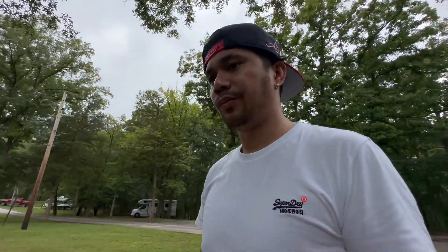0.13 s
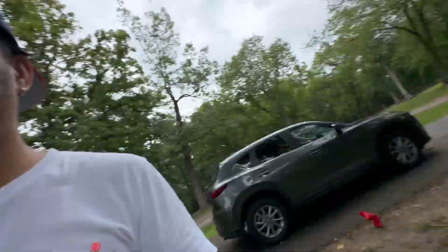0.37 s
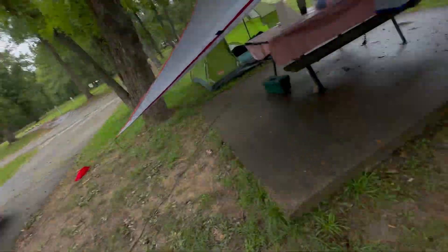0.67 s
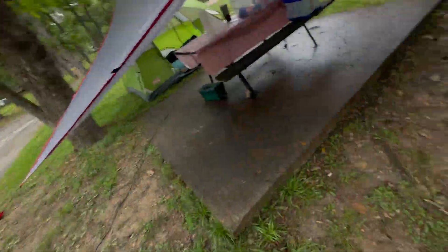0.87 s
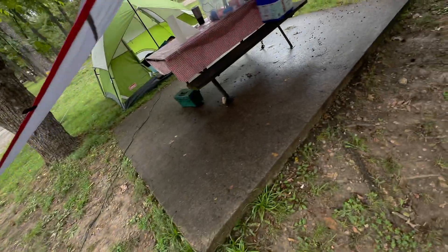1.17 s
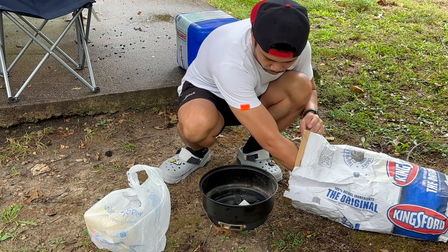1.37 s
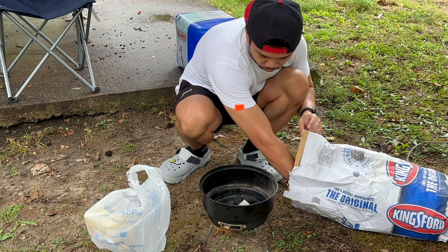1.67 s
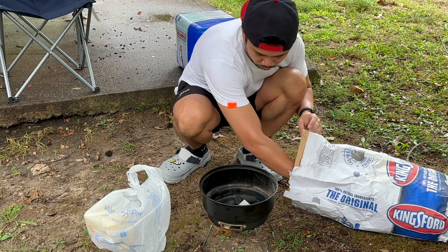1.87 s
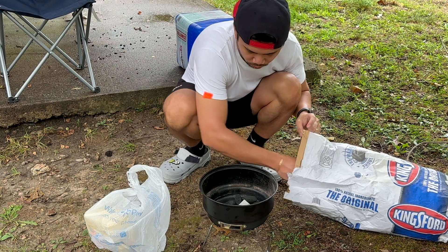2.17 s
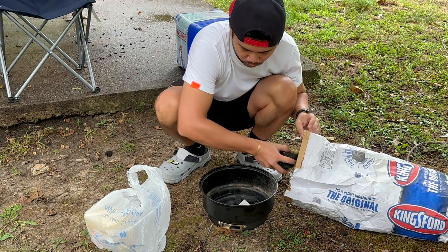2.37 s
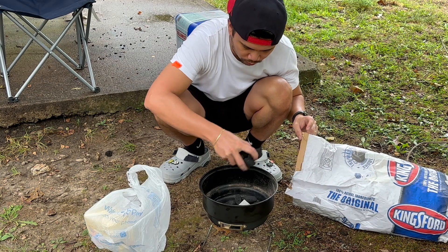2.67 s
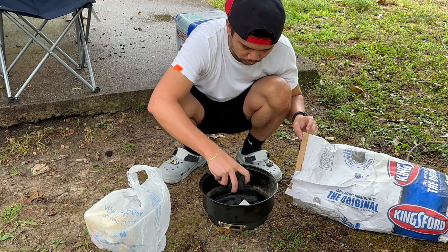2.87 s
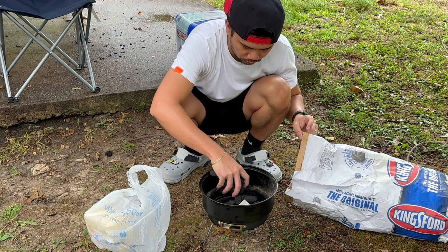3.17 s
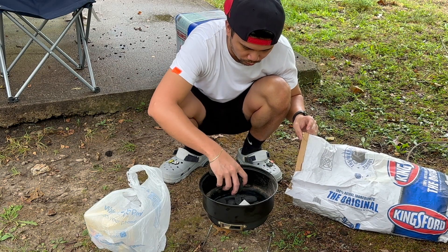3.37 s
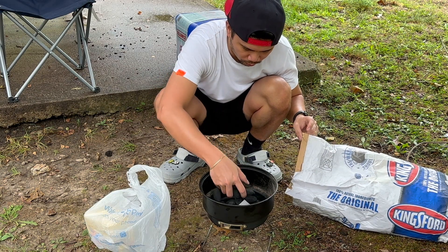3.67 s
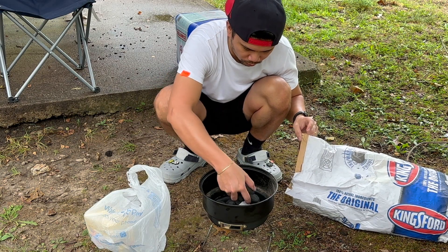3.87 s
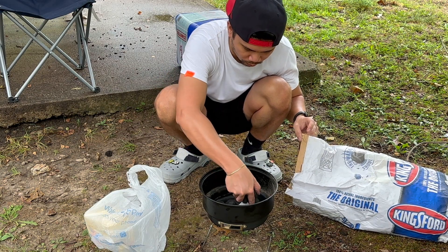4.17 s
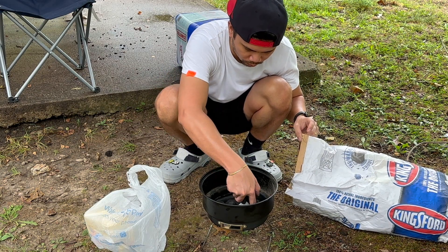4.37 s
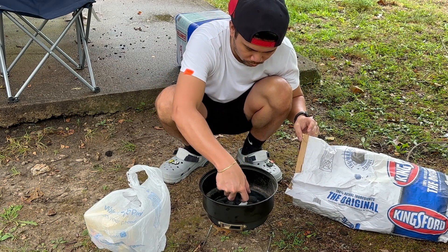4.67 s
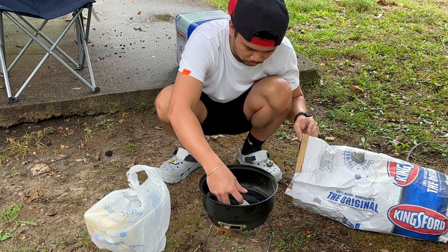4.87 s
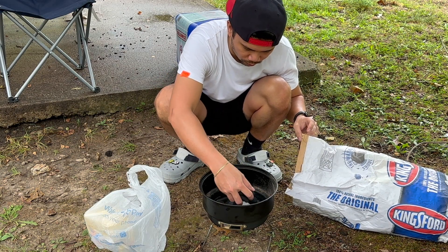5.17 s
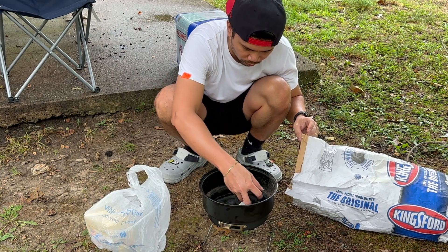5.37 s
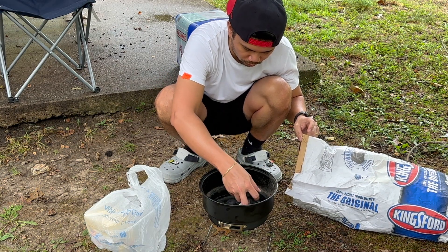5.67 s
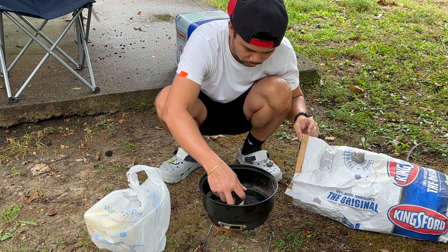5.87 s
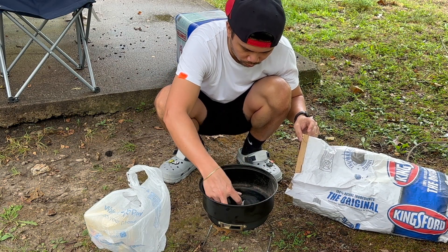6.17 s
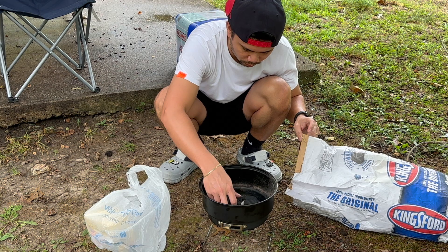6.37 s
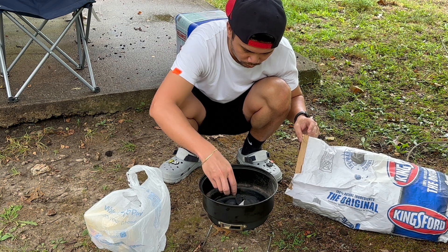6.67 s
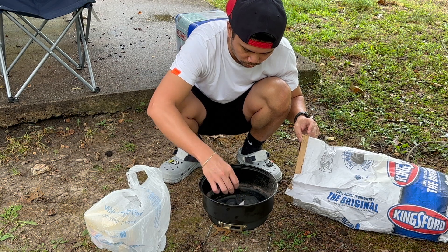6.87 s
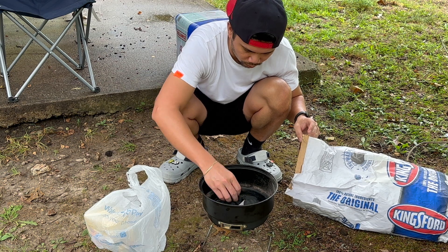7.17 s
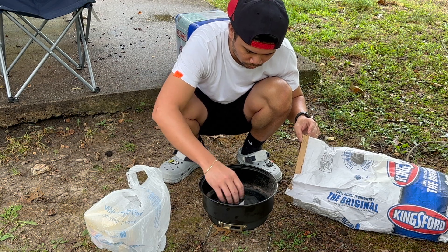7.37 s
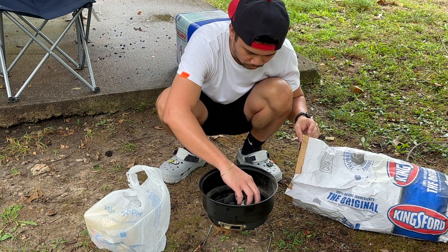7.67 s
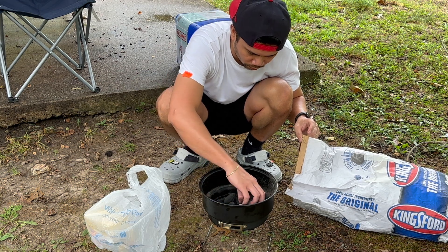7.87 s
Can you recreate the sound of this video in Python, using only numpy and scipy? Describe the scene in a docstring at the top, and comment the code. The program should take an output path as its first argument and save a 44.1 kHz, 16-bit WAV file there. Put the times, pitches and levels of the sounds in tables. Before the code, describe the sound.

From 0 to 1.3 seconds a hand-held microphone is carried round outdoors: low wind buffet, soft leaves, faint hiss and small dry ticks, the strongest near 0.7, over a low distant engine. An abrupt cut at 1.3 brings close stiff paper, crinkling with hollow thumps and crisp snaps, busiest until 1.7 and again around 2.2, fading by 2.4. Charcoal lumps begin knocking into a thin steel bowl at 3.0, clatter brightly around 3.3, and strike the loudest clang at 3.6, leaving a thin ring; smaller hits follow near 3.85. Softer dull clicks of lump on lump run from 4.4 to 5.05, with isolated knocks at 5.75 and 6.2. A second strong clang comes at 6.75 amid a quick cluster, then lighter knocks continue to 7.5, and a last faint one at 7.8. Far traffic, a wavering low engine drone and barely audible insects continue to about 8 seconds.

```python
"""Lumps of charcoal knock and clang in a thin steel grill bowl, taken by hand from a rustling paper sack
outdoors, over distant engine hum and insects. Before that, up to a cut, a hand-held microphone swings
round in light wind with a few ticks. Steel and lumps are damped sines struck by noise and set off at
listed times; paper, wind, leaves and air are shaped noise; the engine is a drifting sine."""
import sys
import numpy as np
from scipy import signal
from scipy.fft import rfft, irfft, next_fast_len
from scipy.io import wavfile
from scipy.ndimage import uniform_filter1d, map_coordinates

SR = 44100
rng = np.random.default_rng(int(sys.argv[2]) if len(sys.argv) > 2 else 0)


def level_to_linear(level):
    """Convert decibel levels to linear amplitude factors, elementwise."""
    exponent = np.asarray(level, float) / 20
    return 10 ** exponent


def wrap_up_sound(samples):
    """Save the sound to the file named by the first command line argument, as 16-bit audio."""
    columns = np.atleast_2d(samples).T
    # keep every value between -1 and 1, then stretch to whole-number steps
    tamed = np.clip(columns, -1, 1)
    steps = np.round(tamed * 32767).astype(np.int16)
    wavfile.write(sys.argv[1], SR, steps)


N = 353682  # length in samples
CUT_S = 1.333  # the microphone swing ends here and the charcoal scene begins

# how alike outdoor air sounds at left and right: (frequency [Hz], likeness [-1 to 1])
ALIKE = [(60, 1), (180, 0.82), (550, 0.16), (1650, -0.14), (4970, 0.92), (15000, 0.12)]


def unit(x):
    """Scaled to rms 1."""
    return x / np.sqrt(np.mean(x ** 2) + 1e-20)


def along(points, hz):
    """Reads (frequency [Hz], value) points on a log frequency axis."""
    f, v = np.transpose(points)
    return np.interp(np.log(hz + 1), np.log(f + 1), v)


def curves(rows):
    """One value per sample for each column after the time [s]; -150 outside the table."""
    s, *cols = np.transpose(rows)
    return [np.interp(np.arange(N) / SR, s, c, left=-150, right=-150) for c in cols]


def wobble(rate):
    """A smooth random curve with rate knots a second."""
    knots = rng.standard_normal(int(N * rate / SR) + 4)
    return map_coordinates(knots, [np.arange(N) * rate / SR])


def swells(rows, edge_db):
    """Summed gain of (time [s], half length [s], level [dB]) swells that rise and fall evenly in dB.

    Each falls by edge_db over one half length, on both sides."""
    t = np.arange(N) / SR
    return sum(level_to_linear(db - edge_db * np.abs(t - s) / half_s) for s, half_s, db in rows)


def filtered(x, response):
    """Filters x by a complex response of frequency."""
    m = next_fast_len(x.shape[-1] + 8192)  # room for the filter's tail
    spectrum = rfft(x, m) * response(np.fft.rfftfreq(m, 1 / SR))
    return irfft(spectrum, m)[..., :x.shape[-1]]


def rush(spectrum, alike, grit_db):
    """Stereo noise of rms 1; grit_db breaks it into short grains."""
    grains = level_to_linear(grit_db * (wobble(250) + wobble(40)))
    pair = rng.standard_normal((2, N)) * grains

    def mid_side(hz):
        turn = np.arccos(np.clip(along(alike, hz), -1, 1)) / 2
        return level_to_linear(along(spectrum, hz)) * [np.cos(turn), np.sin(turn)]

    mid, side = filtered(pair, mid_side)
    return unit(np.array([mid + side, mid - side]))


def ring(t, hz, db, t60, attack):
    """Sum of damped sines, one per mode, with a soft onset of attack seconds."""
    hz, db, t60 = (np.reshape(v, (-1, 1)) for v in (hz, db, t60))
    modes = level_to_linear(db - 60 * t / t60) * np.sin(2 * np.pi * hz * t)
    return modes.sum(0) * (1 - np.exp(-t / attack))


def add(track, s, sound):
    """Mixes a sound in at s seconds."""
    part = track[round(s * SR):][:len(sound)]
    part += sound[:len(part)]


def bowl():
    """Each contact knocks dully, clangs the sheet and sounds the note of the bowl's floor."""
    # a lump strikes bare steel: (time [s], level [dB], knock re level [dB],
    # floor note re level [dB], hardness [dB per octave])
    bare_hits = [(3.1413, -32.5, -1, -1, 5), (3.1691, -38, -7, -0.5, 2.5), (3.289, -27, -25, -4.5, -3),
                 (3.3128, -23.5, -23.5, -1.5, -3.5), (3.3332, -25, 1.5, -5, 5), (3.382, -33.5, 2, 1, 6),
                 (3.45, -34.5, -3.5, -3, 1.2), (3.5938, -10, -19, -12, 2.5), (3.6234, -31, 3.5, 16, -11.5),
                 (3.8457, -29.5, 2.5, -6.5, 6.5), (3.8804, -32.5, 1, -12, -5), (4.8485, -39, 7.5, -9.5, 8),
                 (5.4554, -57, 3, -8, 5.5), (6.7221, -31.5, -3, -4.5, -6), (6.7471, -18, -14.5, 0, 2.5),
                 (6.772, -27.5, -18.5, 3, 1), (6.8193, -29.5, -18.5, -20, 0), (6.8654, -41.5, -18.5, -2, 4),
                 (6.9446, -42.5, -18, -5, 0.5), (7.0375, -46.5, -21, -9, 0.3),
                 (7.0993, -43.5, -5.5, -11, -6), (7.1707, -48.5, -21, -7.5, -2.3)]
    # a lump lands on other lumps: (time [s], knock level [dB], clang re knock [dB])
    lump_hits = [(3.0375, -42.5, -10), (3.1096, -43.5, -8.5), (4.4466, -42, -10.5), (4.513, -46, -5.5),
                 (4.554, -37.5, -11.5), (4.5848, -43, -10), (4.6932, -49, -12), (4.8125, -41.5, -13.5),
                 (4.995, -47.5, -8.5), (5.0276, -44, -11), (5.0404, -44.5, -6), (5.7464, -31.5, -11),
                 (6.2141, -49, -11.5), (6.6048, -53.5, -9), (7.187, -38, -14.5), (7.2098, -38, -12),
                 (7.3865, -32, -12.5), (7.5014, -52.5, -11), (7.5233, -43.5, -26), (7.8278, -44, -21)]
    # the heaviest drops jolt the lumps off the floor: (from [s], to [s])
    jolts = [(3.59, 3.61), (6.7, 6.85)]
    # dull knock of a lump on the loaded bowl: (frequency [Hz], width [Hz], level [dB])
    lump_modes = [(565, 47, -2.5), (784, 80, -7.5), (1000, 54, -0.5), (1320, 140, -12.5), (1920, 71, -19)]
    # clear modes of the undamped sheet: (frequency [Hz], level [dB], t60 [s])
    clear_modes = [(544, -10, .12), (2113, -2, .22), (2410, -20, .4), (2995, -3, .24), (3348, -14, .22),
                   (3507, -15, .22), (3665, -15, .2), (4040, -5, .24), (4107, -2, .12), (4210, -15, .4),
                   (4441, -16, .45), (4538, -16, .15), (4786, -15, .12), (5180, -21, .22), (5400, -17, .25),
                   (5534, -20, .24), (5841, -25, .28), (6390, -27, .22), (6925, -24, .26), (8270, -23, .22),
                   (8651, -25, .2)]

    out, t = np.zeros(N), np.arange(SR // 2) / SR
    lump_hz, lump_width, lump_db = np.transpose(lump_modes)
    hz, mode_db, t60 = np.transpose(clear_modes)
    steel = crowd(t)
    # hits on other lumps in the columns of bare hits: floor note 16 dB under the knock, soft contact
    muffled = [(s, db + clang_db, -clang_db, -16 - clang_db, -3.5) for s, db, clang_db in lump_hits]
    for s, db, knock_db, note_db, hardness_db in bare_hits + muffled:
        lifted = any(start < s < end for start, end in jolts)
        free = 0.89 if lifted else 0.73  # freedom of the steel to ring, 1 = undamped
        # the floor sounds a scattered note under lumps, a fixed one free of them
        note_hz = 965.2 if lifted else 1011 + 16 * rng.standard_normal()

        spread = 1 + 0.033 * rng.standard_normal(len(lump_hz))  # no two lumps are alike
        scattered_db = lump_db + rng.normal(0, 2.5, len(lump_hz))
        knock = ring(t, lump_hz * spread, scattered_db, 2 / lump_width, .0015)
        grain = rng.standard_normal(len(t))
        crumble = unit(filtered(grain, lambda f: np.exp(-np.log(f / 850 + 1e-9) ** 2 / .5)))
        knock = knock + 0.48 * level_to_linear(-60 * t / 0.054) * (1 - np.exp(-t / 0.0029)) * crumble

        # the crumbly lump chatters against the steel for some milliseconds, with a faint longer tail
        chatter = rng.standard_normal(len(t)) * (level_to_linear(-60 * t / .012) + 0.071 * level_to_linear(-60 * t / 0.42))
        chatter = chatter / np.linalg.norm(chatter)
        force = filtered(chatter, lambda f: level_to_linear(hardness_db * np.log2(f / 3000 + 0.31)))
        bare_db = np.clip(-.35 * knock_db, -6, 0)  # lump on lump hardly wakes the clear modes
        clear_db = mode_db + bare_db + hardness_db * np.log2(hz / 3000) + rng.normal(0, 3, len(hz))
        clear = ring(t, hz, clear_db, t60, .003)
        dense = signal.fftconvolve(force, steel)[:len(t)]
        damping = level_to_linear(-60 * t * (1 / free - 1) / 0.17)
        clang = (dense + 1.126 * clear) * damping

        # a close pair of floor modes beats
        note = ring(t, [note_hz, note_hz + 21], [0, -6], free * np.array([.33, .28]), 0.0027)
        add(out, s, level_to_linear(db + knock_db + 3.5) * knock + level_to_linear(db - 10) * clang + level_to_linear(db + note_db) * note)
    return out


def crowd(t):
    """Impulse answer of the hundreds of crowded weak modes of the steel."""
    # balance of the dense modes: (frequency [Hz], relative level [dB])
    dense_balance = [(300, -40), (540, -16.5), (1000, -13), (1500, -9), (2150, -1), (2600, -8), (3000, -7),
                     (3600, -8.5), (4100, -9), (4900, -21), (5600, -17.5), (7000, -20.5), (8300, -26),
                     (11000, -32.5), (13500, -24.5), (16000, -39.5)]
    # their typical decay: (frequency [Hz], t60 [s])
    dense_t60 = [(500, 0.12), (2000, 0.16), (5000, 0.2), (9000, 0.3), (14000, 0.11)]

    hz = 400 + 15800 * rng.random(700) ** 1.5  # more crowded toward the low end
    db = along(dense_balance, hz) - 9 + 3 * rng.standard_normal(700)
    t60 = along(dense_t60, hz) * level_to_linear(1.5 * rng.standard_normal(700))
    return ring(t, hz, db, t60, 0.0015)


def rim():
    """Long thin tones of the free rim after hard blows, until something touches it."""
    # modes of the rim: (frequency [Hz], relative level [dB], t60 [s])
    rim_modes = [(560, -3, 1.4), (947, -1, 4), (1437, -9, 1.1), (1960, -3, 2.1), (2256, 0, 1.2),
                 (2304, -3, 3), (2686, -6, .85), (4210, 0, .5), (4511, 3, .55), (4646, 2, .6),
                 (5776, -18, .6)]
    # blows that set it singing: (time [s], level [dB])
    blows = [(3.595, -51.5), (3.846, -58.5), (6.747, -62.5)]
    # a hand or lump stops the rim: (time [s])
    touches = [4.447, 7.1]

    out, t = np.zeros(N), np.arange(2 * SR) / SR
    hz, mode_db, t60 = np.transpose(rim_modes)
    for s, db in blows:
        touch = min(h for h in touches if h > s) - s
        damped = level_to_linear(-250 * np.clip(t - touch, 0, None))  # 250 dB per second once touched
        add(out, s, damped * ring(t, hz, db + mode_db, t60, 0.0069))
    return out


def sack():
    """Stiff paper: grainy crinkle and a hollow thump at each tug, and single snaps as it creases."""
    # paper creases: (time [s], relative level [dB], hollow part re that level [dB])
    snaps = [(1.337, -45, 4), (1.36, -48, 8), (1.3758, -42, -5), (1.4087, -48, 1), (1.4462, -38, -2),
             (1.4664, -31.5, 6), (1.4874, -39, -1), (1.512, -53.5, 19), (1.6352, -49, 10), (1.67, -41, 0),
             (1.81, -47.5, -22), (1.8934, -49, -7), (1.9453, -56, 22), (2.0782, -52, -18), (2.11, -46, -5),
             (2.1647, -35, 0.5), (2.2097, -36, -29), (2.238, -43, -10)]
    # the hand tugs in the sack: (time [s], half length [s], relative thump [dB], relative crinkle [dB])
    tugs = [(1.35, .02, -44, -65), (1.399, 0.0234, -33, -46), (1.468, .02, -32.5, -49),
            (1.577, 0.028, -38.5, -52), (1.702, 0.033, -39, -48), (1.817, 0.028, -43.5, -54),
            (1.962, 0.013, -44.5, -76), (2.07, 0.13, -46.5, -53), (2.225, 0.044, -54, -54.5),
            (2.247, 0.017, -45, -63), (2.328, 0.023, -68, -63.5)]
    # spectrum of the crisp paper: (frequency [Hz], relative level [dB])
    crinkle_spectrum = [(700, -25), (1200, 2), (2500, -1), (4500, -7), (7000, -11), (10000, -17.5),
                        (13000, -17), (16000, -26)]
    # spectrum of the hollow sack: (frequency [Hz], relative level [dB])
    thump_spectrum = [(110, -30), (180, -9.5), (333, -2), (524, -9), (1110, -13.5), (1700, -23.5),
                      (2000, -29), (2600, -39), (4400, -120)]

    crisp, hollow, t = np.zeros(N), np.zeros(N), np.arange(SR // 10) / SR
    for s, db, hollow_db in snaps:
        burst = level_to_linear(db - 60 * t / 0.0355) * (1 - np.exp(-t / .001))
        add(crisp, s, burst)
        add(hollow, s, level_to_linear(hollow_db - 0.5) * burst)
    after = np.arange(N) > CUT_S * SR
    pressed = swells([(s, half_s, db) for s, half_s, db, _ in tugs], 8.5) * after
    crumpled = swells([(s, half_s, db) for s, half_s, _, db in tugs], 8.5) * after
    # one channel of each noise: the sack is a single source
    thump = (level_to_linear(-6.0) * pressed + hollow) * rush(thump_spectrum, [(500, 0.71)], 1.6)[0]
    crinkle = (level_to_linear(-4.5) * crumpled + 0.45 * crisp) * rush(crinkle_spectrum, [(500, 0.71)], 1.8)[0]
    return thump + crinkle


def ticks():
    """Small knocks on the hand-held microphone: a noise click and a few short damped tones."""
    # (time [s], relative level [dB], low tone [Hz], brightness re level [dB])
    taps = [(0.371, -40.5, 820, -14), (0.546, -40.5, 872, -18), (0.613, -44, 745, -12),
            (0.707, -26.5, 892, -9.5), (0.722, -42, 840, -8), (0.767, -39.5, 824, -10),
            (0.861, -42, 865, -23), (0.924, -38, 720, -37), (1.009, -52, 444, -16), (1.212, -45, 883, -28),
            (1.284, -34.5, 700, -16.5)]

    out, t = np.zeros(N), np.arange(SR // 10) / SR
    for s, db, hz, bright_db in taps:
        noise = uniform_filter1d(rng.standard_normal(len(t)), size=2)
        click = level_to_linear(db + bright_db - 2.5 - 60 * t / 0.017) * noise
        tone_db = db + np.array([-3, -8, bright_db + 13.0, bright_db - 3.5])
        tones = ring(t, [hz, 1.21 * hz, 2150, 2600], tone_db, [0.033, 0.034, 0.0097, 0.01], 0.0014)
        add(out, s, click + tones)
    return np.array([out, np.roll(out, -2)])  # two samples earlier at the right port, which is nearer


def swing():
    """Low wind buffet on the ports, leaves and hiss while the microphone is carried round."""
    # wind on the ports: (time [s], level [dB])
    wind = [(0, -45.5), (.25, -54), (.48, -46.5), (.8, -55.5), (1.1, -51), (1.333, -54)]
    # leaves, with insects near 7 kHz: (frequency [Hz], relative level [dB])
    leaf_spectrum = [(65, -41), (110, -2.5), (210, -7), (315, -8.5), (380, -19.5), (520, -18), (730, -11),
                     (1110, -20.5), (1440, -18), (1830, -25), (3500, -40), (5300, -44), (6800, -37.5),
                     (8200, -49), (10500, -80), (16000, -59)]
    # treble hiss: (frequency [Hz], relative level [dB])
    hiss_spectrum = [(1200, -22), (2200, 1.5), (4600, -5), (8800, -7.5), (11500, -30), (14000, -22),
                     (16000, -22.5)]
    # short swells of the hiss: (time [s], level [dB])
    brushes = [(0.001, -58), (0.516, -60), (.63, -70), (1.15, -84)]

    wind_spectrum = [(25, -21), (45, 4.5), (60, 13), (110, -4), (200, -55.0)]  # (Hz, relative dB)
    buffet = level_to_linear(curves(wind)[0]) * rush(wind_spectrum, [(60, 0.58)], .4)
    leaves = level_to_linear(-52 + 2.5 * wobble(13.9)) * rush(leaf_spectrum, ALIKE, 0.82)
    hiss_gain = level_to_linear(-73) + swells([(s, 0.048, db) for s, db in brushes], 10.5)
    hiss = hiss_gain * rush(hiss_spectrum, [(3000, 0.073), (9000, 0.083)], 2.9)
    return (buffet + leaves + hiss) * (np.arange(N) < CUT_S * SR)


def camp():
    """Far traffic and air as noise, a drifting engine note, steady hum and insects as narrow noise."""
    # far traffic and air: (frequency [Hz], relative level [dB])
    air_spectrum = [(20, -47.5), (45, -9.5), (76, 0.5), (250, -8.5), (390, -18), (610, -14), (1040, -26),
                    (1740, -22), (2600, -31.5), (4200, -43), (6000, -49), (10500, -60.5), (13500, -59.5),
                    (16000, -62.5)]
    # their course: (time [s], level [dB])
    air_course = [(1.33, -49), (1.53, -49), (1.85, -54), (8.02, -52.5)]
    # engine note: (time [s], frequency [Hz], relative level [dB])
    engine = [(0, 140.3, -44), (.7, 143.4, -49.5), (1.3, 145.4, -56), (1.36, 177.7, -73),
              (1.7, 175.4, -49.5), (2.3, 169.7, -44.5), (3.2, 176.2, -48.5), (4.9, 172, -66),
              (5.4, 185.4, -53.5), (6.4, 186.4, -68.5), (7.2, 184, -58.5), (8.02, 182, -71)]
    # steady machine hum and insect bands: (frequency [Hz], level [dB], width [Hz])
    bands = [(59.7, -67.5, 12), (112.9, -61, 14), (244, -63.5, 8), (319, -64, 1.7), (637, -79.5, 14),
             (6860, -87.5, 270), (7970, -94.5, 97)]

    air = level_to_linear(curves(air_course)[0] + .5 * wobble(3)) * rush(air_spectrum, ALIKE, .3)
    drone_hz, drone_db = curves(engine)
    phase = 2 * np.pi * np.cumsum(drone_hz + 2.8 * wobble(14)) / SR
    drone = level_to_linear(drone_db - 4.0 + 0.5 * wobble(22)) * np.sin(phase)
    for hz, db, width in bands:
        line = filtered(rng.standard_normal(N), lambda f: np.exp(-((f - hz) / width) ** 2))
        # the insect bands, above 5 kHz, sound only after the cut
        present = np.arange(N) > CUT_S * SR if hz > 5000 else 1
        air = air + level_to_linear(db) * unit(line) * present
    return air + drone


def scene():
    """Bowl and sack reach the two ports with a phase lead that depends on pitch."""
    # near sources at the two ports: (frequency [Hz], lead of the left [rad])
    lead = [(300, 0), (1000, -.15), (1650, -1.2), (2300, .2), (3100, .65), (5200, .35), (6700, .4),
            (7450, 3.14), (7950, 5.3), (8600, 6.2), (9300, 5.5), (10000, 4.2), (11000, 3.14), (12100, 2.4),
            (14100, .1), (15600, -.5)]

    def ports(hz):
        return np.exp(.5j * along(lead, hz) * [[1], [-1]])

    return filtered(bowl() + rim() + sack(), ports) + ticks() + swing() + camp()


def band_limit(x):
    """A steep low-pass at the top of the band."""
    return signal.sosfilt(signal.butter(12, 16720, fs=SR, output="sos"), x)


def record(dry):
    """The finished mix as the recorder keeps it."""
    return band_limit(dry)


dry = scene()
out = record(dry)
wrap_up_sound(out)
```